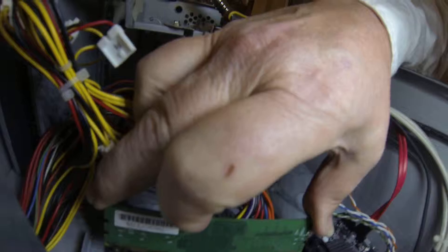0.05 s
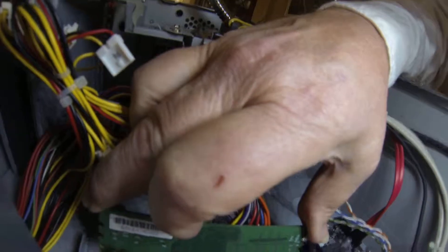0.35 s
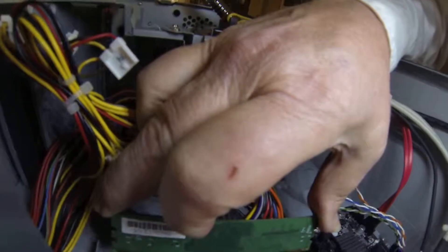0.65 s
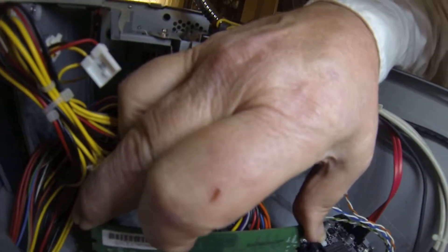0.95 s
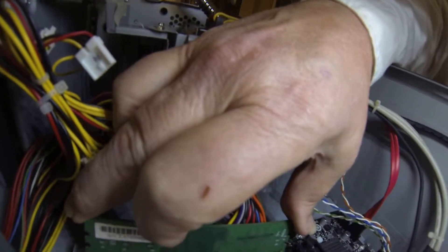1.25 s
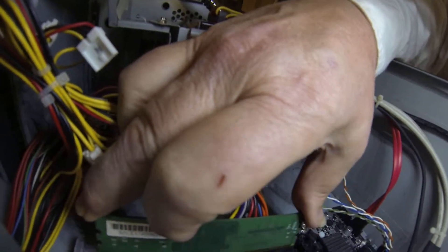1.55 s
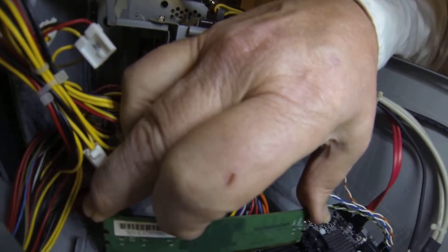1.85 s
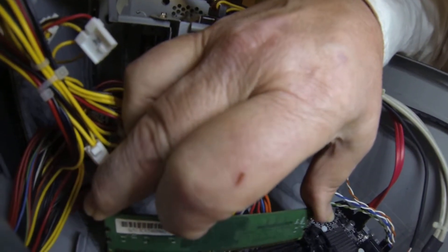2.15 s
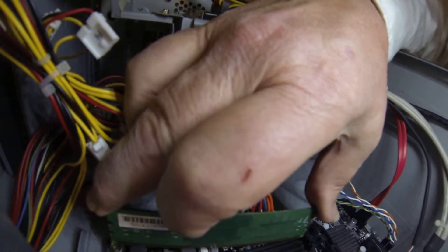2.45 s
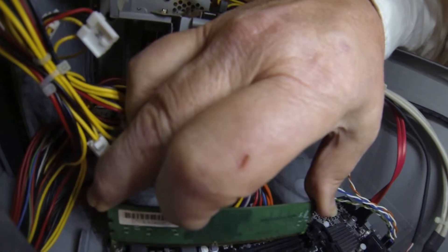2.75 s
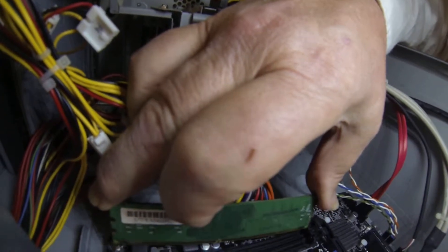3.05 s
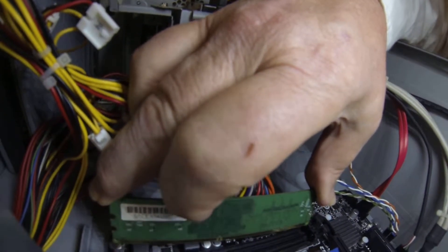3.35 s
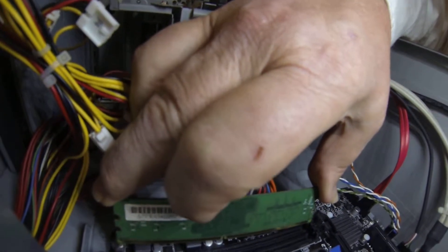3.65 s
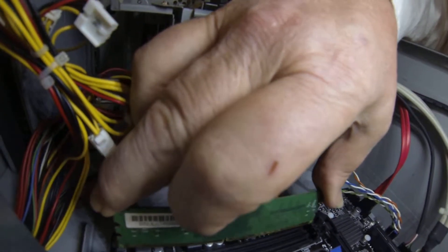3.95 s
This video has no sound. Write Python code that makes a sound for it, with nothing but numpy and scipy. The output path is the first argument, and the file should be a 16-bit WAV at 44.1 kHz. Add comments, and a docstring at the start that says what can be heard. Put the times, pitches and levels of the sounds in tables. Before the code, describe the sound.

Close plastic snaps, ticks and a knock from a hand fitting computer memory.

```python
"""Small plastic parts snap and squeak, close to the microphone, as a hand works a memory module into
its slot inside a computer case. The module's edge slides and ticks along the slot, fingers tap and
rub the board, and one firm knock rings board and case. Mains hum and faint room noise lie underneath."""
import sys
import numpy as np
from scipy import signal
from scipy.fft import rfft, irfft
from scipy.io import wavfile
from scipy.ndimage import uniform_filter1d

SR = 44100
rng = np.random.default_rng(int(sys.argv[2]) if len(sys.argv) > 2 else 0)


def master(y):
    """Save y as 16-bit WAV."""
    cut = np.clip(np.atleast_2d(y).T, -1, 1)
    pcm = np.round(cut * 32767)  # scale
    wavfile.write(sys.argv[1], SR, pcm.astype(np.int16))


N = 176400
t = np.arange(N) / SR
RING_T = t[:SR // 2]  # the half second given to each impact


def knocks():
    """Each blow rings the struck spot, board and case; a softer contact is duller, a lighter one thinner."""
    # Each row: start in seconds, level in dB, low cut and high cut in Hz,
    # pitch of the struck spot in Hz, its relative level in dB.
    blows = [(0.5711, -41.5, 722, 1700, 1256, -7.5), (1.2266, -26, 490, 2400, 868, -9),
             (1.2400, -30, 80, 370, 153, -3.5), (1.257, -30, 80, 402, 170, -24),
             (1.5055, -47, 600, 1800, 1020, -17), (1.5842, -47, 895, 1490, 1150, -14),
             (1.796, -41, 696, 2000, 1290, -18), (1.8140, -42.5, 400, 1300, 896, -3),
             (2.1359, -50, 800, 3000, 1330, -7), (2.417, -39.5, 1290, 2800, 1350, -2.5),
             (2.4221, -35.5, 109, 980, 902, 1), (2.6344, -11.5, 407, 5500, 1030, -14.5),
             (2.6394, -20.5, 303, 2200, 575, -2.5), (2.8313, -44.5, 900, 2800, 1290, -20),
             (2.9313, -42.5, 795, 3020, 1206, -21), (2.9887, -44, 800, 2500, 990, -16),
             (3.1000, -46, 610, 2000, 1300, -16), (3.3432, -42.5, 910, 2000, 1280, -9),
             (3.465, -47.5, 704, 1800, 1300, -14), (3.6327, -46.5, 900, 2000, 1150, -14),
             (3.8637, -40, 300, 616, 484, -2)]
    # Close rings of the struck spot. Each row: multiple of its pitch, level in dB, multiple of its t60.
    spot_modes = [(1, -1.5, 1), (.92, -7.5, .8), (1.07, -10, .7)]
    # Clear modes of board and case. Each row: pitch in Hz, level in dB, t60 in seconds.
    board_modes = [(224.8, -18, 0.23), (302.5, -18, 0.2), (461, -19.5, 0.13), (502.6, -17.5, 0.15),
                   (625.8, -17, 0.25), (720, -28, 0.095), (810, -23, 0.061), (945, -19.5, 0.12),
                   (1115, -15.5, 0.075), (1186, -11, 0.07), (1730, -29, .11), (2083, -21, 0.075),
                   (2336, -20.5, 0.063), (2766, -20, 0.029), (3420, -23, 0.032), (6170, -22.5, 0.023)]
    # Dense ring of the case. Each row: centre of an octave in Hz, level in dB, t60 in seconds.
    case_bands = [(129.6, -18, 0.34), (313, -24, 0.24), (566, -18, 0.22), (935, -20.5, .16),
                  (1970, -31.5, 0.15), (3730, -39.5, 0.16), (8100, -33, .11)]
    # Spectrum of the contact itself. Each row: frequency in Hz, relative level in dB.
    crack_colour = [(200, -5), (600, 4.5), (1100, 8.5), (1600, -2), (2400, -2), (3200, -16), (4500, -8),
                    (8000, -48), (15000, -13)]
    spot_t60_s = 0.069
    out, board = np.zeros(N), modes(board_modes)
    for start, db, lo_hz, hi_hz, spot_hz, spot_db in blows:
        spot = modes([(spot_hz * k, spot_db + d, spot_t60_s * m) for k, d, m in spot_modes])
        case = dense_ring(case_bands, ratio=np.sqrt(2))
        crack = noise(crack_colour, len(RING_T)) * undb(-6.5) * decay(t60=0.025)
        add(out, start, undb(db) * band(spot + board + case + crack, lo_hz, hi_hz))
    return out


def snaps():
    """Stiff plastic parts let go: a crack, a brief ring of body and edge, a faint ring of the board."""
    # Each row: start in seconds, level in dB, body pitch and edge pitch in Hz,
    # edge t60 in seconds, low cut and high cut in Hz.
    releases = [(0.1449, -23, 2850, 3630, 0.00079, 4920, 13900),
                (.2486, -13.5, 2400, 3860, 0.0034, 960, 6900), (0.2737, -22, 2290, 3870, 0.0021, 850, 6150),
                (0.3694, -13.5, 2830, 4390, 0.0018, 990, 14500)]
    # Ring of the snapping edge. Each row: multiple of its pitch, level in dB, multiple of its t60.
    edge_modes = [(1, -8.5, 1.3), (1.52, -10.5, .9), (2.2, -18, .8), (3.2, -22, .8)]
    # The board ringing on. Each row: pitch in Hz, level in dB, t60 in seconds.
    board_modes = [(2110, -52.5, 0.35)]
    body_db, body_t60_s = -18.5, 0.011
    crack_envelope = undb(-20) * decay(t60=0.0018) + undb(-31.5) * decay(t60=0.031)
    out, board = np.zeros(N), modes(board_modes)
    for start, db, body_hz, edge_hz, edge_t60, lo_hz, hi_hz in releases:
        body = modes([(body_hz, body_db, body_t60_s)])
        edge = sum(modes([(edge_hz * k, d, edge_t60 * m)]) for k, d, m in edge_modes)
        crack = rng.standard_normal(len(RING_T)) * crack_envelope
        add(out, start, undb(db) * band(body + edge + crack + board, lo_hz, hi_hz))
    return out


def slot():
    """The module's edge slides grittily along the slot and catches in bright ticks that leave a thin ring."""
    # Swell of the slide. Each row: time in seconds, level in dB.
    slide_levels = [(.6, -88), (.85, -61.5), (1.05, -61), (1.2, -62), (1.32, -56), (1.42, -65), (1.62, -77)]
    # The edge catching. Each row: start in seconds, level in dB.
    catches = [(1.1044, -36), (1.1248, -38), (1.133, -45), (1.1430, -45.5), (1.1642, -49.5), (1.191, -46.5),
               (1.2171, -40), (1.2258, -39), (1.24, -37.5), (1.2576, -31.5), (1.3138, -48.5)]
    # Spectra of the slide and of a tick. Each row: frequency in Hz, relative level in dB.
    slide_colour = [(200, 9), (700, 11.5), (1300, 6.5), (2200, 3.5), (3200, 0), (4200, 0), (5300, -6),
                    (6300, -6.5), (11000, -7), (15000, -23)]
    tick_colour = [(200, 5), (450, -3), (750, 14.5), (1500, -8), (2300, 4.5), (3150, -11), (3600, 2),
                   (3950, -1), (4260, 8.5), (4550, -12), (4900, -11), (5200, 0.5), (5800, -17), (6700, -11),
                   (8300, -5), (9800, -14), (11000, -8), (13000, -18), (15500, -40)]
    # Thin rings of the slot. Each row: centre in Hz, level in dB, t60 in seconds.
    slot_rings = [(4280, -32, 1), (5210, -41, 0.85)]
    grains_per_s, grit_from_s = 260, 1.12
    grains = rng.standard_normal(N) * (rng.random(N) < grains_per_s / SR) * (t > grit_from_s)
    grit = band(grains, lo_hz=6500, hi_hz=12000)
    friction = noise(slide_colour, N) * undb(1.5 * wander(rate_hz=90))
    out = curve(slide_levels) * (friction + undb(-16) * grit / grit.std())
    tick_envelope = decay(t60=0.02) + undb(-14.5) * decay(t60=0.07)
    for start, db in catches:
        tick = noise(tick_colour, len(RING_T)) * tick_envelope
        ring = dense_ring(slot_rings, ratio=2 ** (1 / 16))
        add(out, start, undb(db) * (tick + ring))
    return out


def scuffs():
    """Plastic slips on plastic in short gritty strokes that swell and stop."""
    # Each row: peak time in seconds, level in dB, rise and fall time constants in seconds.
    slips = [(1.80, -62, .003, 0.022), (2.077, -55.5, 0.006, 0.0059), (2.127, -54, .0012, 0.016),
             (2.414, -54, .002, 0.0056), (2.422, -50, 0.004, 0.0039), (2.6335, -29.5, 0.0015, 0.003),
             (2.683, -52.5, .0015, 0.0037), (2.728, -58, 0.019, 0.019), (2.752, -59.5, 0.0096, 0.0085),
             (2.934, -49, 0.0079, 0.0066), (3.001, -47.5, 0.0076, 0.01), (3.33, -63, 0.026, 0.02),
             (3.625, -61, 0.018, .015)]
    # Spectrum of a scuff. Each row: frequency in Hz, relative level in dB.
    colour = [(300, 16), (1000, 8), (1700, 5.5), (2300, 8.5), (3200, 3), (4000, 6.5), (5200, -5),
              (6200, 2.5), (7500, -11), (8800, -9), (10000, -4.5), (15000, -13.5)]
    force = sum(undb(db) * np.exp(-np.maximum((peak - t) / rise, (t - peak) / fall))
                for peak, db, rise, fall in slips)
    return force * noise(colour, N) * undb(1.64 * wander(rate_hz=760))


def rubbing():
    """Fingers rub the board, stirring a few resonances; slipping plastic chirps near the end."""
    # Swell of the rub. Each row: time in seconds, level in dB.
    rub_levels = [(2.78, -86), (2.95, -78), (3.12, -70.5), (3.35, -76.5), (3.48, -77), (3.56, -91),
                  (3.75, -96)]
    # Resonances of the board. Each row: centre in Hz, width in Hz, level in dB.
    resonances = [(2770, 280, 0.5), (3740, 190, -4.5), (6000, 590, -13)]
    # Tiny high chirps. Each row: peak time in seconds, level in dB, half-length in seconds.
    chirps = [(3.505, -78, 0.023), (3.62, -76, 0.028)]
    friction = sum(undb(db) * resonant_noise(hz, width) for hz, width, db in resonances)
    chirp_envelope = sum(undb(db) * np.exp(-((t - peak) / half) ** 2) for peak, db, half in chirps)
    return curve(rub_levels) * friction + chirp_envelope * resonant_noise(hz=9800, width_hz=350)


def squeak():
    """A faint, unsteady plastic squeak dips, rises and falls in pitch among the snaps."""
    # Each row: time in seconds, pitch in Hz, level in dB.
    glide = [(.165, 5020, -80), (.18, 4550, -62), (.197, 4240, -69), (.225, 4540, -65), (.25, 4800, -69),
             (.28, 4700, -77), (.3, 4380, -70), (.335, 4380, -79)]
    pitch_jitter, flutter_db = 0.0157, 3
    times, hz, db = np.array(glide).T
    pitch = np.interp(t, times, hz) * (1 + pitch_jitter * wander(rate_hz=600))
    level = curve(np.c_[times, db]) * undb(flutter_db * wander(rate_hz=151))
    return level * np.sin(2 * np.pi * np.cumsum(pitch) / SR)


def room():
    """Mains hum over room noise whose bass wavers and whose hiss is steady."""
    # Each row: multiple of the mains frequency, rms level in dB.
    harmonics = [(1, -43.5), (3, -64)]
    # Spectrum of the room noise. Each row: frequency in Hz, relative level in dB.
    colour = [(20, -52), (35, -54.5), (70, -56.5), (110, -63), (170, -63.5), (280, -64.5), (450, -75.5),
              (1000, -81), (2500, -87.5), (5000, -93), (10000, -100.5), (15000, -103)]
    mains_hz, air_db, bass_below_hz, waver_db = 50, -52, 182, 1
    hum = sum(np.sqrt(2) * undb(db) * np.sin(2 * np.pi * k * mains_hz * t) for k, db in harmonics)
    air = noise(colour, N) * undb(air_db)
    bass = signal.sosfiltfilt(signal.butter(2, bass_below_hz, fs=SR, output="sos"), air)
    return hum + air + bass * (undb(waver_db * wander(rate_hz=14)) - 1)


def undb(db):
    """Decibels to gain."""
    return 10 ** (np.asarray(db) / 20)


def decay(t60):
    """Exponential decay that falls 60 dB in t60 seconds."""
    return np.exp(-np.log(1000) * RING_T / t60)


def curve(rows):
    """Gain over time from (seconds, dB) points, silent outside them."""
    return undb(np.interp(t, *np.array(rows).T, left=-120, right=-120))


def wander(rate_hz):
    """Smooth random wander with a spread of 1."""
    hold = int(SR / rate_hz)
    steps = np.repeat(rng.standard_normal(N // hold + 1), hold)
    x = uniform_filter1d(steps, hold)[:N]
    return x / x.std()


def band(x, lo_hz, hi_hz):
    """Low cut and high cut, 12 dB an octave."""
    for hz, kind in ((lo_hz, "high"), (hi_hz, "low")):
        x = signal.sosfilt(signal.butter(2, hz, kind, fs=SR, output="sos"), x)
    return x


def noise(colour, size):
    """Noise of rms 1 with a spectrum of (Hz, dB) points."""
    hz, db = np.array(colour).T
    freqs = np.maximum(np.fft.rfftfreq(size, 1 / SR), 1)
    gain = undb(np.interp(np.log(freqs), np.log(hz), db))
    x = irfft(rfft(rng.standard_normal(size)) * gain, size)
    return x / x.std()


def resonant_noise(hz, width_hz):
    """Friction noise in one resonance; rms 1."""
    x = band(rng.standard_normal(N), 20, hz * 2)
    for _ in range(2):  # two broader peaks in series narrow to about width_hz
        x = signal.lfilter(*signal.iirpeak(hz, hz / width_hz / 1.5, fs=SR), x)
    return x / x.std()


def modes(rows):
    """Decaying sines of alternating sign from (Hz, dB, t60) rows."""
    return sum((-1) ** k * undb(db) * decay(t60) * np.sin(2 * np.pi * hz * RING_T)
               for k, (hz, db, t60) in enumerate(rows))


def dense_ring(rows, ratio):
    """Many close modes: for each (Hz, dB, t60) row, decaying noise from Hz / ratio to Hz * ratio."""
    size = len(RING_T)
    out = np.zeros(size)
    for hz, db, t60 in rows:
        sos = signal.butter(3, [hz / ratio, hz * ratio], "band", fs=SR, output="sos")
        cluster = signal.sosfilt(sos, rng.standard_normal(2 * size))[size:]
        out += cluster / cluster.std() * undb(db) * decay(t60)
    return out


def add(out, start_s, x):
    """Mix x in at start_s."""
    i = int(start_s * SR)
    out[i:i + len(x)] += x[:N - i]


def scene():
    """One microphone close to the hand in the computer case, with the room behind."""
    return (room() + snaps() + slot() + knocks() + scuffs() + rubbing() + squeak())[None]


def record(dry):
    """The recorder opens after a moment and cuts the top of the treble."""
    start_s, fade_s, top_hz = 0.1, 0.011, 15700
    opened = dry * np.clip((t - start_s) / fade_s, 0, 1)
    return signal.sosfilt(signal.ellip(8, .2, 70, top_hz, fs=SR, output="sos"), opened)


dry = scene()
out = record(dry)
master(out)
```